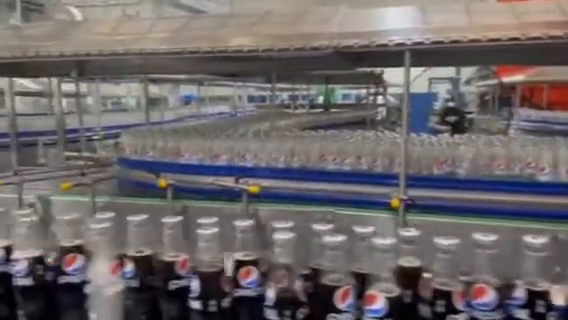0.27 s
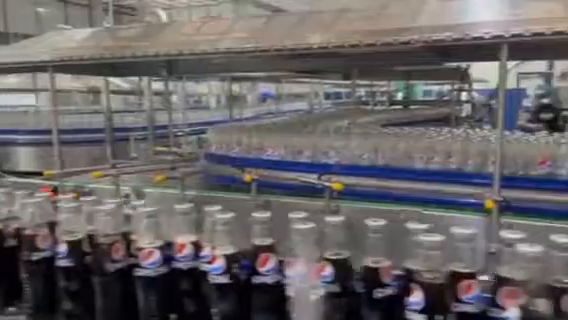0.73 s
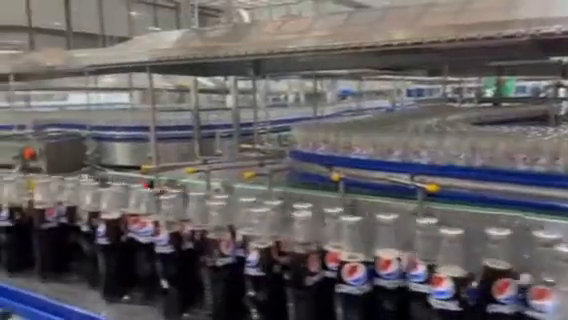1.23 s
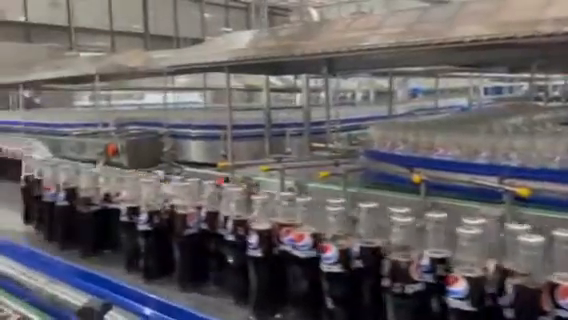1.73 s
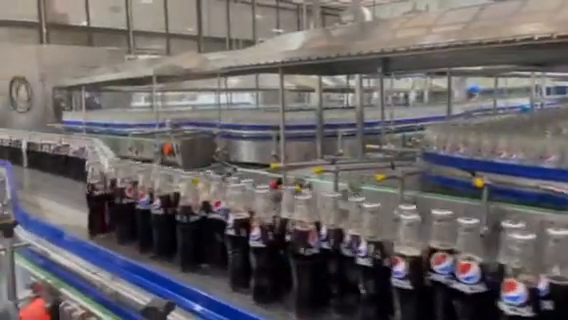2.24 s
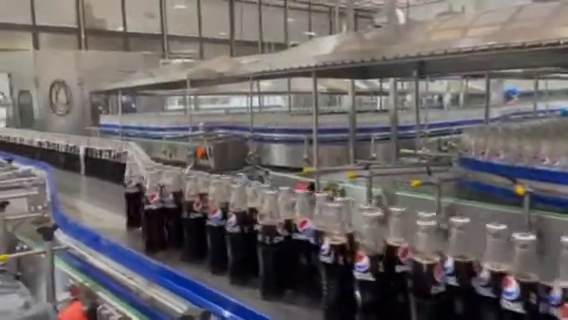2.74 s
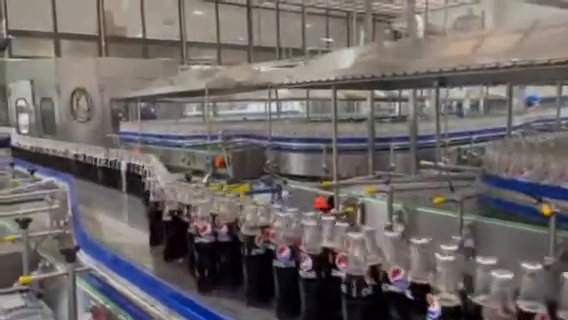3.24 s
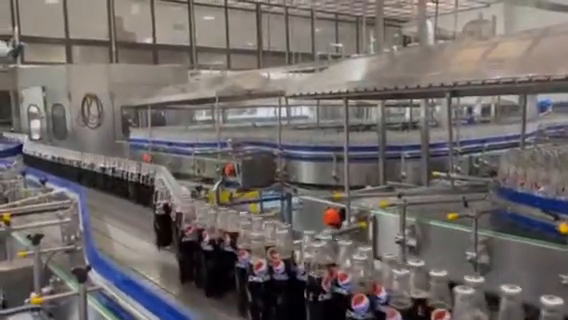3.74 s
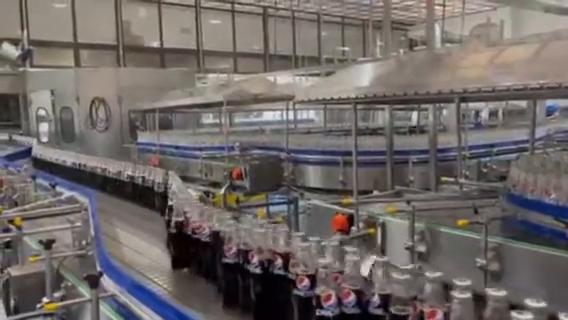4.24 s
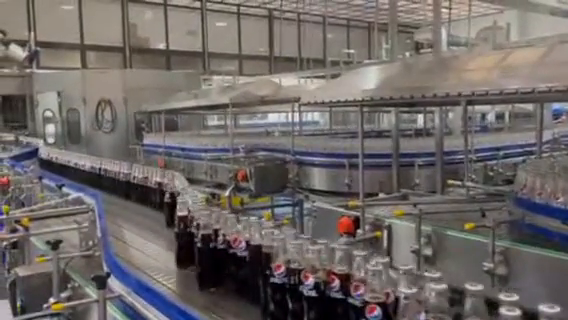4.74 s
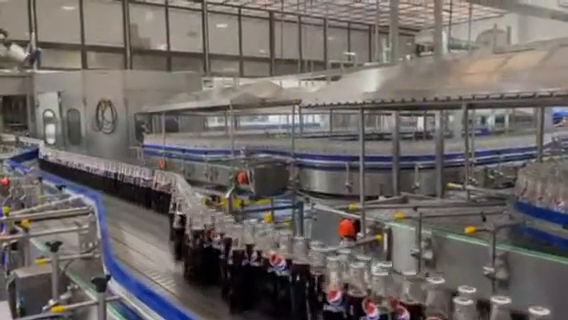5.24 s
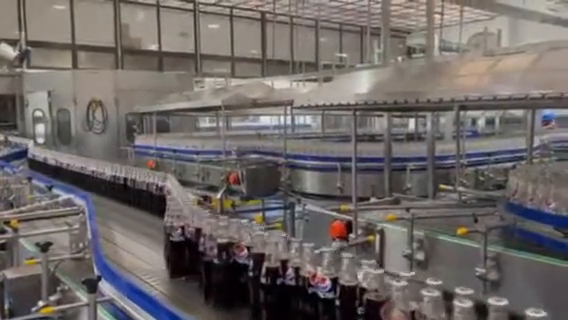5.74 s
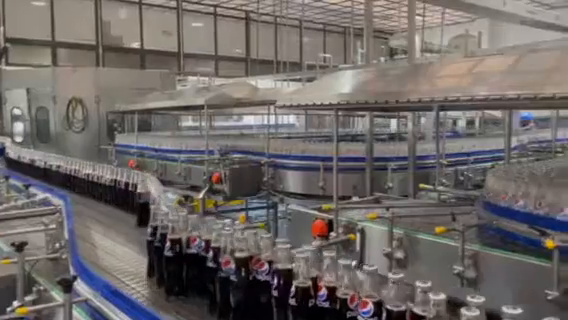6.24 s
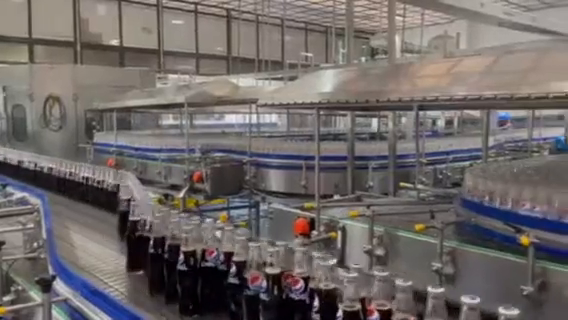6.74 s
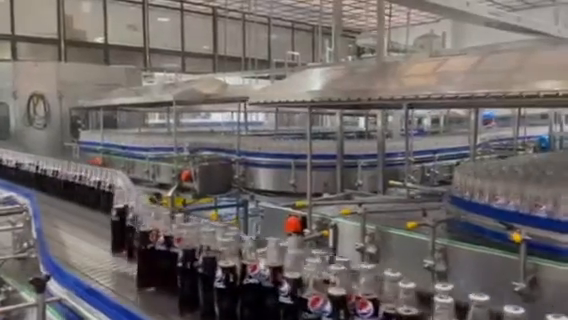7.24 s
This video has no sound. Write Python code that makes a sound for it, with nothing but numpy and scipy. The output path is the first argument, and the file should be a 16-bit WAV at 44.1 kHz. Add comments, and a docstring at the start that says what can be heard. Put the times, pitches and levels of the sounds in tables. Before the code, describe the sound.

A large, hard-walled bottling hall, heard in stereo from beside the line. Throughout about 7.5 seconds, filled glass bottles jostle in a dense, irregular tinkle with fine scuffing, over a steady broad machinery roar, rattling metal slats, low motor hum and bright air hiss. Clinks and hard rail knocks cluster around 0.3 s, with more clinks near 1 s and knocks at 1.4, 2.0 and 2.3 s. The low rumble swells around 1.5 s, then eases. At 2.7-3.1 s the bottles grind together, with a strong, short glassy squeal and quick chatter. Sharp tapping surges near 3.4 and 3.8 s. Another squeal and duller knocks come at 4.75 s, then a busy run of clinks and clacks from 5 to 6.1 s. A fainter squeal sounds near 6.3 s, a firm knock at 6.8 s, a tap flurry at 7.1 s, and final clinks at 7.4 s as machinery continues.

```python
"""Filled glass bottles jostle on a conveyor in a large, echoing bottling hall.
Random taps, hundreds a second and in bouts, excite the same few damped glass modes; scuffs are denser contacts.
Nearer clinks and knocks are struck mode sets, chatters are tap trains, squeals are wavering sines.
Behind them: a roar of shaped noise, rattling slats, rumbling and humming drives, and hissing air."""
import sys
import numpy as np
from scipy import signal
from scipy.fft import rfft, irfft
from scipy.io import wavfile
from scipy.ndimage import uniform_filter1d

SR = 44100
rng = np.random.default_rng(int(sys.argv[2]) if len(sys.argv) > 2 else 0)


def store_pcm(level_fs):
    """Save levels as 16-bit WAV."""
    pcm = np.round(np.clip(level_fs, -1, 1) * 32767).astype(np.int16)
    wavfile.write(sys.argv[1], SR, np.atleast_2d(pcm).T)


N = 330750
FREQS = np.maximum(np.arange(N // 2 + 1) * SR / N, 1)
HALL_T60_S = 1.07

# Likeness of the two ears in the diffuse field. Each row: frequency in Hz, correlation.
LIKENESS = [(60, 1), (160, 0.9), (350, 0.76), (600, 0.27), (850, 0.015), (1200, 0.19), (1800, -0.32),
            (2500, 0.28), (3400, -0.17), (4500, 0.61), (5600, -0.21), (6500, 1), (7200, -0.88)]


def from_db(db):
    """Decibels to amplitude gain."""
    return 10 ** (np.asarray(db) / 20)


def rms_one(x):
    """Scale to unit rms."""
    return x / np.sqrt(np.mean(x ** 2) + 1e-20)


def in_time(rows):
    """Each column of a time curve, at every sample."""
    s, *columns = np.transpose(rows)
    return [np.interp(np.arange(N) / SR, s, c) for c in columns]


def over_hz(rows):
    """Each column of a spectrum, at every frequency, interpolated over log frequency."""
    hz, *columns = np.transpose(rows)
    return [np.interp(np.log(FREQS), np.log(hz), c) for c in columns]


def drift(corner_hz):
    """Smooth random wandering, rms 1."""
    smooth = rfft(rng.standard_normal(N)) / (1 + (FREQS / corner_hz) ** 2)
    return rms_one(irfft(smooth, N))


def ring(clicks, hz, t60_s):
    """Two-pole resonator: a unit click starts a decaying sine of height 1."""
    r = from_db(-60 / (t60_s * SR))
    w = 2 * np.pi * hz / SR
    return signal.lfilter([0, np.sin(w)], [1, -2 * r * np.cos(w), r * r], clicks + 1e-18)


def two_ears(pair, alike):
    """Mix two unrelated spectra into left and right with the given correlation."""
    alike = np.clip(alike, -1, 1)
    common = np.sqrt(1 + alike) * pair[0]
    opposed = np.sqrt(1 - alike) * pair[1] * [[1], [-1]]
    return (common + opposed) / np.sqrt(2)


def noise_spectrum(rows, alike):
    """Spectrum of stereo noise with the given density in dB per Hz."""
    white = rfft(rng.standard_normal((2, N)))
    return two_ears(white, alike) * from_db(over_hz(rows)[0]) * np.sqrt(SR / 2)


def hall(x, t60_s):
    """Diffuse echo: convolution with decaying stereo noise of about unit energy per ear."""
    tail = rng.standard_normal((2, N)) * from_db(-60 * np.arange(N) / SR / t60_s)
    tail = irfft(two_ears(rfft(tail), over_hz(LIKENESS)[0]), N)[:, :2 * SR]
    return signal.fftconvolve(x[None], tail / np.sqrt(np.sum(tail ** 2) / 2), axes=1)


def running_hall(x, sway_s=0.00039, sway_hz=.7):
    """Hall already full of a ceaseless sound; echo paths stretch as the microphone sways."""
    echo = hall(x, HALL_T60_S)
    # the tail past the end wraps round to the start
    echo = echo[:, :N] + np.pad(echo[:, N:], ((0, 0), (0, 2 * N - echo.shape[1])))
    now = np.arange(N)
    heard = now + sway_s * SR * np.sin(2 * np.pi * sway_hz * now / SR)
    return np.array([np.interp(heard, now, ear) for ear in echo])


def placed(x, pan_db, lag_samples):
    """Near source: level difference (left over right) and delay of the right ear."""
    left = x * from_db(pan_db / 2)
    right = np.roll(x, lag_samples) * from_db(-pan_db / 2)
    return np.array([left, right])


def add(out, s, sound):
    """Mix a short stereo sound in at its time."""
    at = max(round(s * SR), 0)
    out[:, at:at + sound.shape[1]] += sound[:, :out.shape[1] - at]


def uneven_bands(x, depth_db, size=3):
    """Random gain, smoothed over neighbouring bands and about 0.1 s, makes the level uneven."""
    bands = signal.stft(x, nperseg=1024)[2]
    field = rng.standard_normal(bands.shape[-2:])
    field = uniform_filter1d(field, size, axis=0)
    field = rms_one(uniform_filter1d(field, 2 * size, axis=1))
    gain = rms_one(from_db(depth_db * field))
    return signal.istft(bands * gain, nperseg=1024)[1][..., :N]


def surges(rows, attack_s, release_s):
    """Summed power of bouts that rise, hold and die away."""
    t = np.arange(N) / SR
    power = 0
    for s, db, held_s in rows:
        rise = np.clip((t - s) / attack_s, 0, 1)
        fall = np.exp(-np.maximum(t - s - attack_s - held_s, 0) / release_s)
        power = power + (from_db(db) * rise * fall) ** 2
    return power


def struck(modes, hz, t60_s, attack_s, scatter, colour_db):
    """Modes swell to a peak of 1 and decay; each blow varies pitch and weight, weak modes most."""
    t = np.arange(SR // 4) / SR
    sound = 0
    for ratio, level_db in modes:
        detuned, stronger = rng.standard_normal(2) * min(abs(level_db) / 10, 1)
        mode_hz = hz * ratio * (1 + scatter * detuned)
        tone = np.sin(2 * np.pi * (mode_hz * t + rng.random()))
        sound = sound + from_db(level_db + colour_db * stronger) * tone
    decay = from_db(-60 * np.maximum(t - attack_s, 0) / t60_s)
    sound = sound * np.minimum(t / attack_s, 1) * decay
    return sound / np.abs(sound).max()


def jostle():
    """Levels in dB of dull shoves and sharp taps: bouts summed in power with steady crowding."""
    # Steady jostling of the queue. Each row: time in seconds, dull shoves in dB, sharp taps in dB.
    crowding = [(0, -37, -36), (2.1, -37, -37), (2.7, -35, -34), (3.8, -31, -32.5), (5.2, -39, -31),
                (6.5, -38, -33), (7.5, -36.5, -32)]
    # Pushes that grind the bottles together. Each row: start in seconds, level in dB, hold in seconds.
    shove_bouts = [(2.8, -26.5, 0.15), (3.56, -37, .14), (4.38, -35, 0.22), (4.73, -32, 0.072),
                   (5.34, -32, 0.053), (6.22, -33.5, .55)]
    # Bottles catching up in a flurry of taps. Each row: start in seconds, level in dB, hold in seconds.
    flurries = [(.66, -45, 0.23), (1.32, -36.5, 0.17), (2.19, -35, 0.2), (3.36, -31, 0.12),
                (3.76, -34.5, 0.047), (4.76, -34, .08), (5.18, -36.5, 0.31), (5.77, -34.5, .1),
                (6.4, -39, .06), (7.09, -32.5, 0.07)]
    shove_db, tap_db = in_time(crowding)
    shoves = from_db(shove_db) ** 2 + surges(shove_bouts, attack_s=0.054, release_s=0.23)
    taps = from_db(tap_db) ** 2 + surges(flurries, attack_s=0.034, release_s=0.24)
    return 10 * np.log10(shoves), 10 * np.log10(taps)


def queue(count=16, taps_per_s=22, size_db=3.1, bunching_db=3.7, detune=0.0142, colour_db=2.5,
          shove_pan_db=-3.0, tap_pan_db=3.5, direct_db=-6.5, hall_db=-0.5):
    """Bottles touch in bunches; walls differ slightly, so each mode becomes a cluster."""
    # Modes of a filled bottle. Each row: nominal frequency in Hz, relative level in dB,
    # T60 in seconds, share driven by sharp taps (0-1).
    bottle_modes = [(2809, -4.5, 0.1, 0.16), (2908, -4.5, .08, 0.2), (4495, -11, 0.069, 0.2),
                    (4840, -4.3, 0.06, 1), (5050, -11, 0.04, 1), (5287, -5.5, 0.05, 1),
                    (5820, -11, 0.06, 1), (6960, -15.5, .05, 1), (7287, -15.5, .05, .8)]
    shove_db, tap_db = jostle()
    near = np.zeros((len(bottle_modes), 2, N))
    for bottle in range(count):
        # taps_per_s is the rate at zero drift
        chance = taps_per_s * from_db(bunching_db * drift(7)) / SR
        touch = np.flatnonzero(rng.random(N) < chance)
        sizes = np.resize(rng.exponential(1, 1024), len(touch))
        force = from_db(size_db * np.minimum(sizes, 4))
        wall = 1 + detune * np.sqrt(3) * (2 * (bottle + .5) / count - 1)
        lag_samples = rng.integers(-1, 5)
        for k, (hz, _, t60_s, _) in enumerate(bottle_modes):
            # the spot touched weights and signs each mode
            spot = from_db(colour_db * rng.standard_normal(1024)) * rng.choice([-1, 1], 1024)
            clicks = np.zeros(N)
            clicks[touch] = force * np.resize(spot, len(touch))
            near[k] += placed(ring(clicks, hz * wall, t60_s), 0, lag_samples)
    out = 0
    for mode, (_, level_db, _, sharp) in zip(near, bottle_modes):
        sharp = np.clip(sharp, 0, 1)
        echo = running_hall(mode[0])
        heard = rms_one(from_db(direct_db) * mode + from_db(hall_db) * echo)
        drive_db = sharp * tap_db + (1 - sharp) * shove_db
        pan_db = (sharp * tap_pan_db + (1 - sharp) * shove_pan_db) * np.array([[.5], [-.5]])
        out = out + heard * from_db(level_db + drive_db) * from_db(pan_db)
    return out


def scuffs(bouts_per_s=130, bout_s=.004, contacts_per_s=260, size_db=2.5, t60_cycles=22, pan_db=0.5,
           echo_db=-7, level_db=-35.5, count=26):
    """Heels and shoulders scuff past each other: overlapping bursts of tiny, damped contacts."""
    # Colour of the scuffing. Each row: frequency in Hz, relative level in dB.
    scuff_colour = [(1400, -4), (1800, -1), (2400, -1), (3300, -5), (4200, -1.5), (5500, -4.5), (7000, -8)]
    starts = (rng.random(N) < bouts_per_s / SR) * 1.0
    pressure = signal.lfilter([1], [1, -np.exp(-1 / (bout_s * SR))], starts + 1e-18)
    chance = contacts_per_s / SR * pressure / pressure.mean()
    colour_hz, colour_db = np.transpose(scuff_colour)
    out = np.zeros((2, N))
    for hz in np.geomspace(colour_hz[0], colour_hz[-1], count):
        at = np.flatnonzero(rng.random(N) < chance)
        force = from_db(size_db * np.minimum(rng.exponential(1, 2048), 3))
        force = force * rng.choice([-1, 1], 2048)
        contacts = np.bincount(at, np.resize(force, len(at)), N)
        sound = rms_one(ring(contacts, hz, t60_cycles / hz))
        sound = sound * from_db(np.interp(hz, colour_hz, colour_db))
        out += placed(sound, pan_db, rng.integers(-3, 5))
    return from_db(level_db) * rms_one(out + from_db(echo_db) * running_hall(out[0]))


def rattle(low_hz, high_hz, hits_per_s, size_db, t60_cycles, level_db, pan_db, count):
    """Random blows of uneven force on many parts, each ringing at its own pitch."""
    out = np.zeros((2, N))
    for hz in np.geomspace(low_hz, high_hz, count) * rng.uniform(.98, 1.02, count):
        at = np.flatnonzero(rng.random(N) < hits_per_s / SR)
        force = from_db(size_db * np.minimum(rng.exponential(1, 512), 3.5))
        blows = np.zeros(N)
        blows[at] = np.resize(force, len(at))
        sound = ring(blows, hz, t60_cycles / hz) * np.sqrt(hz)
        out += placed(sound, pan_db, rng.integers(-3, 5))
    return from_db(level_db) * rms_one(out + running_hall(out[0]))


def chain():
    """Slats clatter on the steel frame, bottle heels clack on them, loose bottles ping along the line."""
    slats = rattle(low_hz=559.7, high_hz=2464, hits_per_s=8, size_db=3.5, t60_cycles=49,
                   level_db=-34.5, pan_db=6.5, count=30)
    heels = rattle(low_hz=1550, high_hz=2600, hits_per_s=3.5, size_db=2.0, t60_cycles=150,
                   level_db=-42.5, pan_db=1.0, count=12)
    loose = rattle(low_hz=3500, high_hz=4700, hits_per_s=3.2, size_db=1.8, t60_cycles=420,
                   level_db=-45, pan_db=2.0, count=16)
    return slats + heels + loose


def panels(echo_db, count=10):
    """Early echoes off steel panels comb a steady sound; one response for both ears."""
    delays_s = rng.uniform(.006, .07, count)
    response = np.zeros(N)
    response[0] = 1
    response[(delays_s * SR).astype(int)] = from_db(echo_db) * rng.choice([-1, 1], count) / np.sqrt(count)
    return rfft(response / np.linalg.norm(response))


def steadied(x, share=0.66, window_s=0.115):
    """Machines under constant load do not swell: four low octaves keep close to their mean level."""
    spectrum, out = rfft(x), x
    for low_hz in 110 * 2 ** np.arange(4):
        band = irfft(spectrum * ((FREQS >= low_hz) & (FREQS < 2 * low_hz)), N)
        power = uniform_filter1d(np.mean(band ** 2, axis=0), int(window_s * SR))
        gain = (power / power.mean()) ** (-np.clip(share, 0, 1) / 2)
        out = out + band * (gain - 1)
    return out


def band_noise(hz, width_hz, size):
    """Band-passed noise, rms 1."""
    edges_hz = [hz - width_hz / 2, hz + width_hz / 2]
    band = signal.butter(2, edges_hz, "band", fs=SR, output="sos")
    settled = signal.sosfilt(band, rng.standard_normal(size + SR // 4))[SR // 4:]
    return rms_one(settled)


def roaring(pan_db=1.0, flutter_db=0.3, patchy_db=1.0, panel_db=-21):
    """Distant machines merge into a roar: shaped diffuse noise, combed and steadied."""
    # Roar of the hall before level changes. Each row: frequency in Hz, density in dB per Hz.
    roar_density = [(22, -90), (32, -85), (42, -102), (72, -64), (140, -62), (225, -63.5), (340, -60.5),
                    (520, -61), (740, -59.5), (1250, -60.5), (1650, -61.5), (2000, -66.5), (2500, -66),
                    (3250, -71), (4100, -69), (6400, -77.5), (9500, -102)]
    # Slow change of the roar. Each row: time in seconds, relative level in dB.
    roar_level = [(0, -0.5), (1.1, -0.6), (2.6, 0.5), (3.25, 0.9), (4.65, 0), (4.95, 0.5), (6.05, 1.2),
                  (6.6, -0.1), (7.5, 1)]
    spectrum = noise_spectrum(roar_density, over_hz(LIKENESS)[0])
    roar = irfft(spectrum * panels(panel_db), N)
    roar = steadied(uneven_bands(roar, patchy_db))
    roar = roar * from_db(in_time(roar_level)[0] + flutter_db * drift(10.0))
    return roar * from_db(pan_db * np.array([[.5], [-.5]]))


def drives(rumble_db=-2, waver_db=2.0, waver_hz=0.88, pan_db=1.0):
    """Conveyor drives: resonant frame noise rumbles, wavering motor sines hum."""
    # Rumble before the rumble_db trim. Each row: time in seconds, level in dB.
    rumble_level = [(0, -51), (1.3, -46), (1.5, -42), (3.6, -50), (6, -52), (7.5, -50)]
    # Drive frame resonances. Each row: frequency in Hz, width in Hz, relative level in dB.
    frame_modes = [(59, 11, 5), (48, 11, -11)]
    # Motor tones before wavering. Each row: frequency in Hz, rms level in dB.
    motors = [(59.2, -52.5), (177.6, -51), (368, -51), (598, -67)]
    frame = sum(from_db(level_db) * band_noise(hz, width_hz, N) for hz, width_hz, level_db in frame_modes)
    # slightly even out the envelope
    frame = rms_one(frame / np.abs(signal.hilbert(frame)) ** .15)
    hum = from_db(in_time(rumble_level)[0] + rumble_db) * frame
    for hz, level_db in motors:
        phase = 2 * np.pi * np.cumsum(hz + waver_hz * drift(2.96)) / SR
        hum += np.sqrt(2) * from_db(level_db + waver_db * drift(4.8)) * np.sin(phase)
    return placed(hum, pan_db, 0)


def air(wander_db=1.0, follow=.06):
    """Bright hiss, its bands slightly uneven; grows a little with the taps, left-right phase offset."""
    # Air hiss before level changes. Each row: frequency in Hz, density in dB per Hz.
    hiss_density = [(4000, -95), (6500, -80), (7600, -75), (9000, -74), (10500, -75.6), (12300, -77),
                    (14000, -76), (15700, -83)]
    # Left-right phase and correlation of the hiss. Each row: frequency in Hz, phase in rad, correlation.
    hiss_stereo = [(6500, -np.pi, .4), (7700, -np.pi, .99), (9400, -np.pi, .99), (9900, -3.65, .75),
                   (11000, -4.7, .6), (12000, -5.8, .7), (12600, -2 * np.pi, .99)]
    # Slow change of the hiss. Each row: time in seconds, relative level in dB.
    hiss_level = [(0, -1.5), (1.6, -0.3), (2.25, 0.5), (2.9, -0.4), (6, 0), (6.55, -1), (7.5, -0.3)]
    phase, alike = over_hz(hiss_stereo)
    tap_db = jostle()[1]
    left_shift = np.exp(1j * phase * np.array([[1], [0]]))
    hiss = irfft(noise_spectrum(hiss_density, alike) * left_shift, N)
    hiss = uneven_bands(hiss, depth_db=1.5)
    traffic_db = follow * (tap_db - tap_db.mean())
    return hiss * from_db(in_time(hiss_level)[0] + wander_db * drift(16) + traffic_db)


def clinks(rough_db=1.5, pan_db=3.0, echo_db=-6):
    """A bottle skids on its neighbour for a few milliseconds and rings on, unevenly."""
    # Nearer clinks before panning and roughness. Each row: start in seconds, peak in dB, main ring in Hz.
    clink_events = [(.003, -26, 3750), (.312, -27, 4170), (.33, -26, 4510), (.485, -26, 2980),
                    (.828, -27.5, 3560), (.955, -23, 3795), (.968, -27, 4130), (1.222, -29, 3700),
                    (1.565, -29, 4300), (1.64, -29, 4130), (1.95, -29, 3900), (2.008, -25.5, 3990),
                    (2.308, -25, 3510), (2.335, -28, 4480), (2.588, -28, 3800), (2.935, -23, 2990),
                    (3.372, -26.5, 3890), (3.449, -24, 5250), (5.168, -22, 4060), (5.315, -30, 3950),
                    (5.66, -25.5, 4020), (5.663, -27, 4400), (5.676, -28, 3560), (5.75, -24.5, 3750),
                    (5.81, -26.5, 3700), (5.998, -25.5, 3560), (6.745, -28, 3450), (6.793, -28, 2910),
                    (6.957, -23.5, 4480), (7.035, -28, 4060), (7.429, -24, 4340), (7.433, -25, 3880)]
    # Ring of a clink. Each row: ratio to the main ring, relative level in dB.
    clink_modes = [(.93, -10), (.975, -9), (1, -2), (1.02, -7), (1.09, -11.5), (1.3, -13)]
    out = np.zeros((2, N))
    for s, peak_db, hz in clink_events:
        sound = struck(clink_modes, hz, t60_s=.085, attack_s=.007, scatter=0.0297, colour_db=1.5)
        add(out, s, placed(from_db(peak_db) * sound, pan_db, rng.integers(-1, 3)))
    out = out * from_db(rough_db * drift(150))
    return out + from_db(echo_db) * hall(out[0], HALL_T60_S / 2)[:, :N]


def knocks(pan_db=3.0, echo_db=-6):
    """A bottle strikes a guide rail: a hard, quickly damped clack."""
    # Knocks before panning. Each row: start in seconds, peak in dB, centre in Hz, T60 in seconds.
    knock_events = [(.045, -20.5, 1900, .03), (.298, -22, 1900, .04), (.308, -18.5, 2200, .06),
                    (.338, -22, 1900, .025), (1.409, -21.5, 2400, .04), (2.012, -20.5, 2150, .045),
                    (2.302, -19.5, 1900, .035), (3.456, -21.5, 1750, .07), (4.783, -19, 950, .05),
                    (4.789, -18.5, 1500, .06), (5.011, -20, 1550, .06), (5.165, -18.5, 2150, .06),
                    (5.232, -19.5, 2150, .06), (5.778, -22.5, 2100, .04), (5.996, -20.5, 2200, .07),
                    (6.108, -20, 1600, .06), (6.786, -17.8, 1800, .04), (7.422, -21, 2240, .09)]
    # Ring of a knock. Each row: ratio to the centre, relative level in dB.
    knock_modes = [(.68, -10), (.84, -5.5), (.94, -5), (1, -2.5), (1.12, -5.5), (1.27, -8), (1.5, -12)]
    out = np.zeros((2, N))
    for s, peak_db, hz, t60_s in knock_events:
        clack = struck(knock_modes, hz, t60_s, attack_s=.0025, scatter=0.044, colour_db=0.5)
        add(out, s, placed(from_db(peak_db) * clack, pan_db, 0))
    return out + from_db(echo_db) * hall(out[0], HALL_T60_S)[:, :N]


def chatters(taps_per_s=110, size_db=2.5, detune=0.0134, t60_s=0.083, attack_s=0.0086, release_s=0.034,
             pan_db=0.0, echo_db=-6, count=4):
    """Quick uneven taps between touching bottles whose walls ring at nearly the same pitch."""
    # Chatter with one mode standing out. Each row: start in seconds, level in dB, hold in seconds,
    # nominal pitch in Hz.
    chatter_events = [(.66, -45, .22, 5200), (1.1, -43.5, 1.72, 5940), (2.25, -43, .05, 5430),
                      (2.25, -47, .05, 6880), (2.77, -38, 0.054, 4330), (2.93, -41, .14, 3650),
                      (2.95, -41, .27, 4600), (3.01, -35, 0.041, 2910), (3.41, -46, 0.089, 6870),
                      (3.65, -38, 0.035, 2760), (4.11, -39, .05, 5800), (4.37, -44, .05, 3280),
                      (4.381, -38, .025, 2610), (4.419, -39, 0.045, 2870), (4.83, -39, .02, 4480),
                      (5.09, -50, .015, 3250), (5.47, -41, .02, 6730), (6.4, -40, .21, 5330),
                      (7.13, -40, 0.099, 5180)]
    out = np.zeros((2, N))
    for s, db, held_s, hz in chatter_events:
        t = np.arange(int((held_s + .5) * SR)) / SR
        sound = 0
        for wall in 1 + detune * np.linspace(-1, 1, count):
            gaps, sizes = rng.exponential(1, (2, 512))
            at = (np.cumsum(gaps) / taps_per_s * SR).astype(int)
            force = from_db(size_db * np.minimum(sizes, 3))
            taps = np.bincount(at, force, len(t))[:len(t)]
            sound = sound + ring(taps, hz * wall, t60_s)
        fall = np.exp(-np.maximum(t - attack_s - held_s, 0) / release_s)
        swell = np.minimum(t / attack_s, 1) * fall
        add(out, s, placed(from_db(db) * swell * rms_one(sound), pan_db, rng.integers(-1, 3)))
    return out + from_db(echo_db) * hall(out[0], HALL_T60_S / 2)[:, :N]


def squeals(attack_s=0.045, release_s=0.07, waver_hz=20, rough_db=0.5, echo_db=-3):
    """Glass sticks and slips on glass, which keeps its lowest mode ringing unevenly."""
    # One bottle rubbing its neighbour. Each row: start in seconds, level in dB, hold in seconds,
    # mean pitch in Hz.
    squeal_events = [(2.74, -39, .06, 2900), (2.85, -30.5, 0.072, 2874), (3.08, -39, .14, 2920),
                     (3.6, -39, .2, 2965), (4.75, -32.5, 0.13, 2930), (6.26, -41, 0.24, 2940)]
    sound = 0
    for s, db, held_s, hz in squeal_events:
        phase = 2 * np.pi * np.cumsum(hz + waver_hz * drift(24.8)) / SR
        swell = np.sqrt(surges([(s, db, held_s)], attack_s, release_s))
        sound = sound + swell * from_db(rough_db * drift(40)) * np.sin(phase)
    return sound + from_db(echo_db) * hall(sound, HALL_T60_S)[:, :N]


def scene():
    """Glass in front, the plant behind."""
    glass = queue() + scuffs() + clinks() + knocks() + chatters() + squeals()
    plant = chain() + roaring() + drives() + air()
    return glass + plant


def record(dry):
    """The microphone sheds the deepest bass; the top is cut steeply."""
    low_cut = 1 / np.sqrt(1 + (27 / FREQS) ** 8)
    high_cut = 1 / np.sqrt(1 + (FREQS / 15750) ** 800)
    return irfft(rfft(dry) * low_cut * high_cut, N)


dry = scene()
out = record(dry)
store_pcm(out)
```